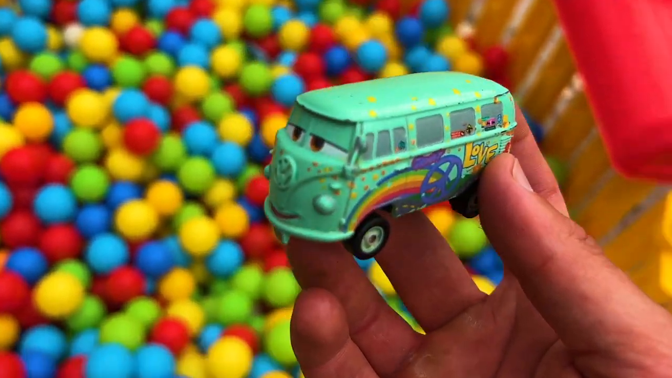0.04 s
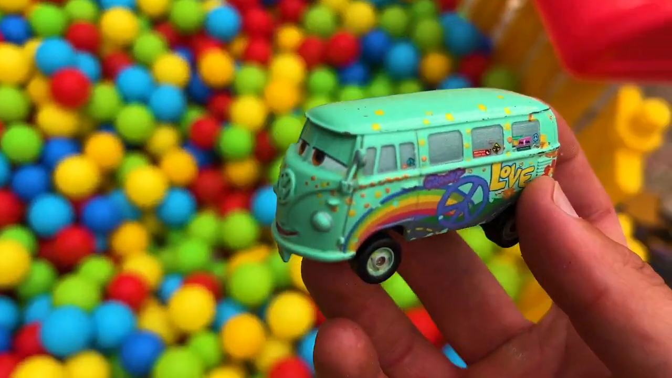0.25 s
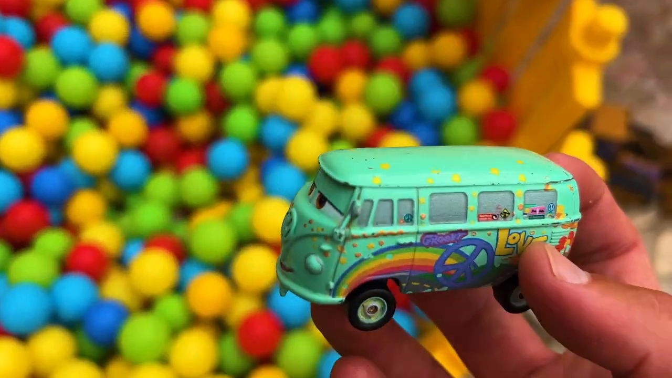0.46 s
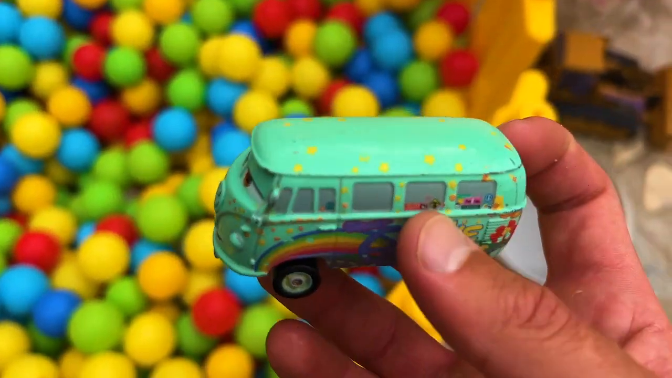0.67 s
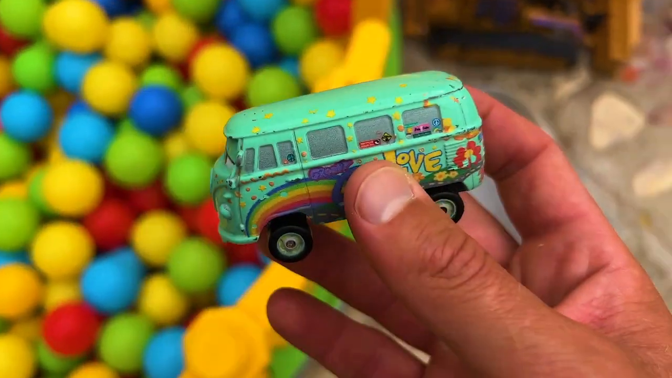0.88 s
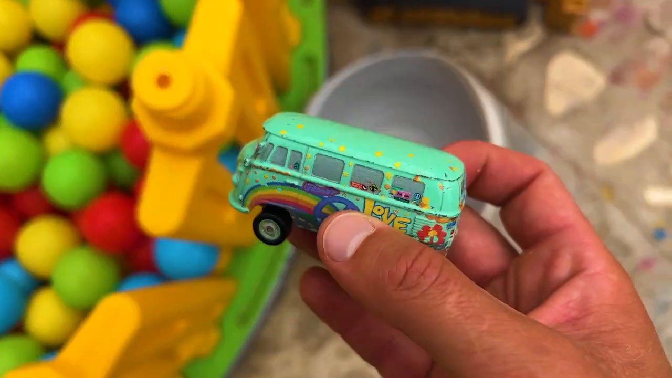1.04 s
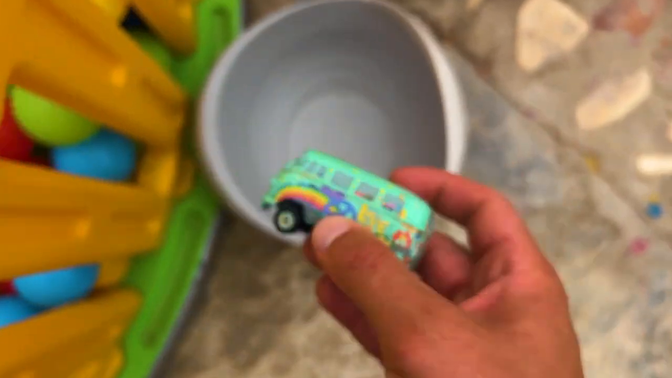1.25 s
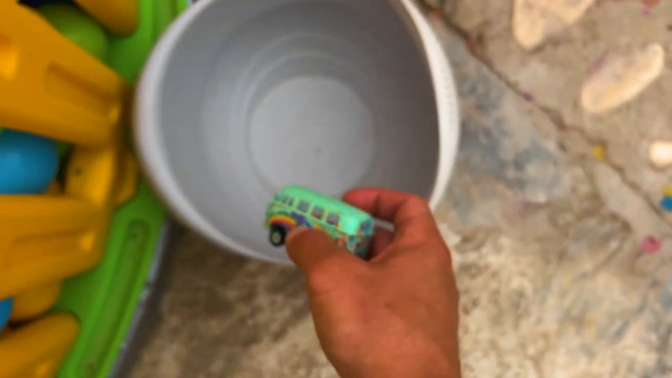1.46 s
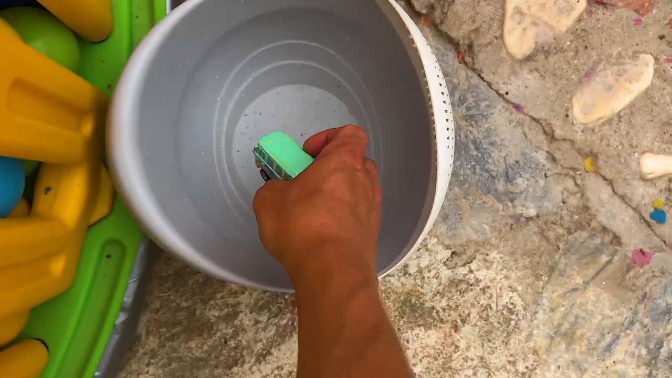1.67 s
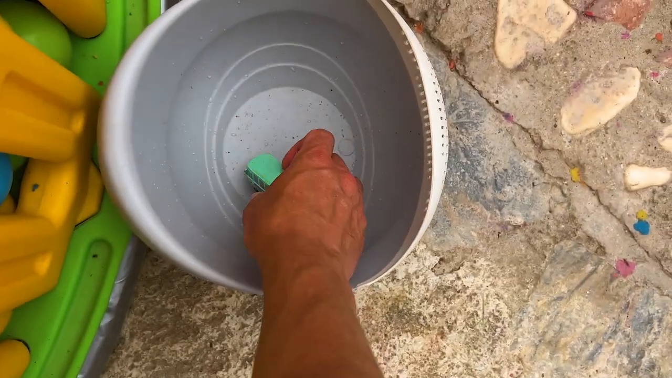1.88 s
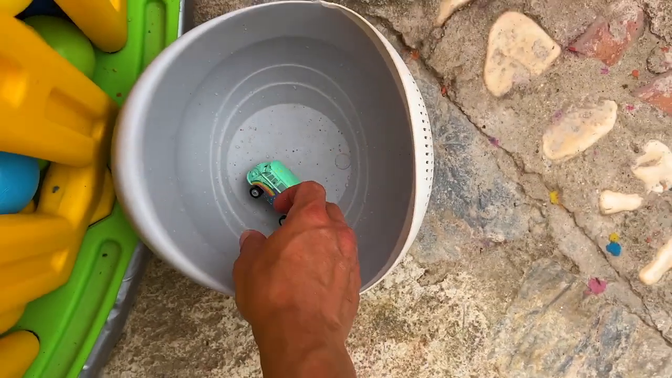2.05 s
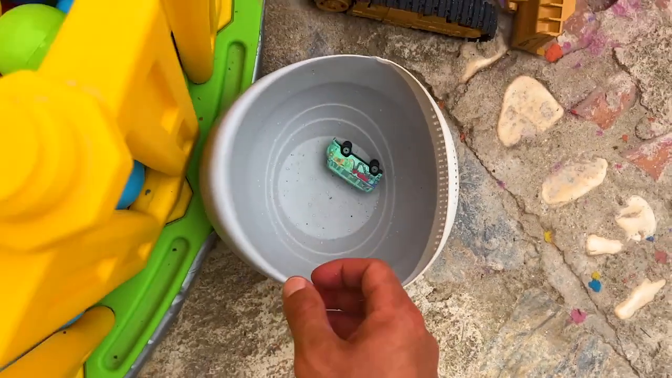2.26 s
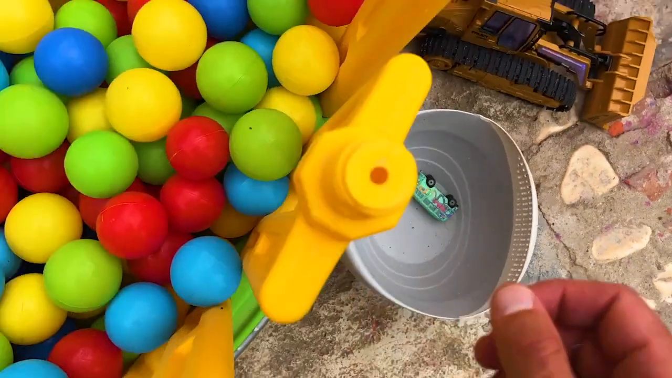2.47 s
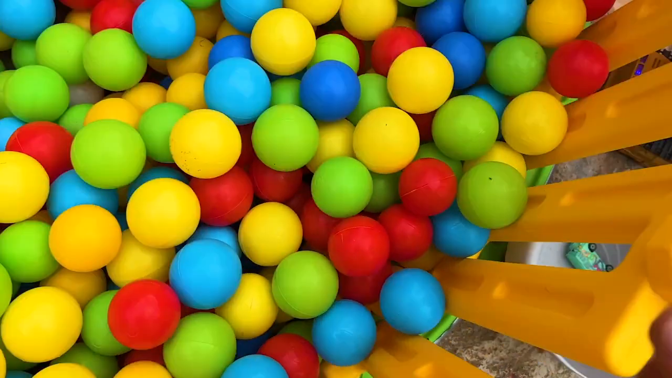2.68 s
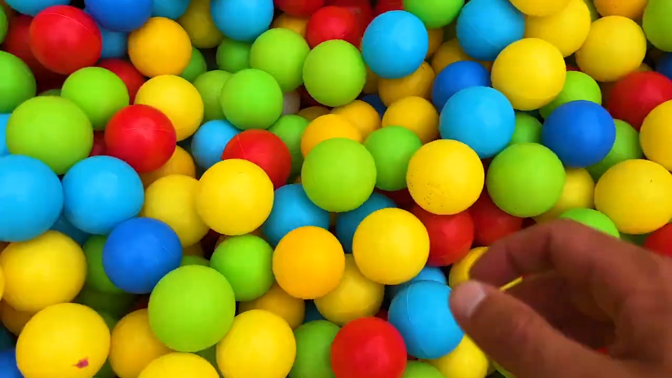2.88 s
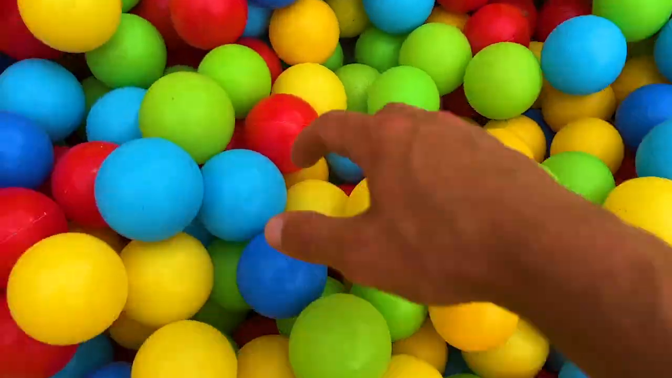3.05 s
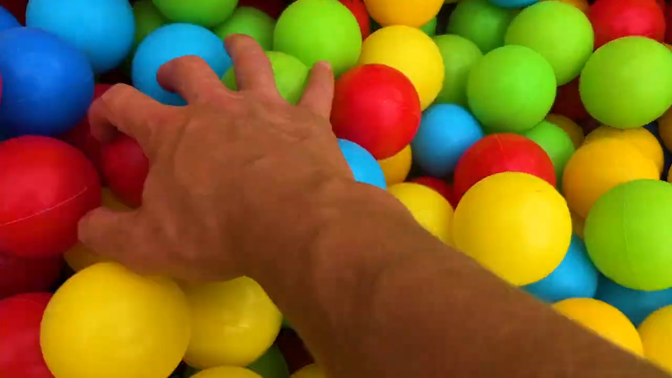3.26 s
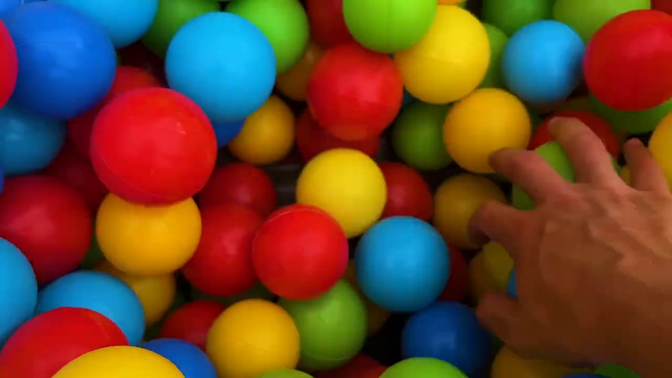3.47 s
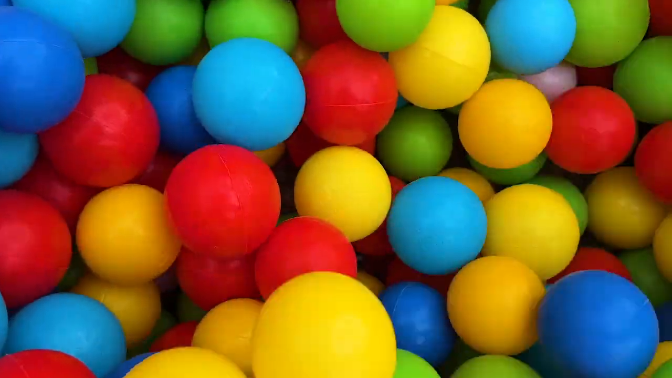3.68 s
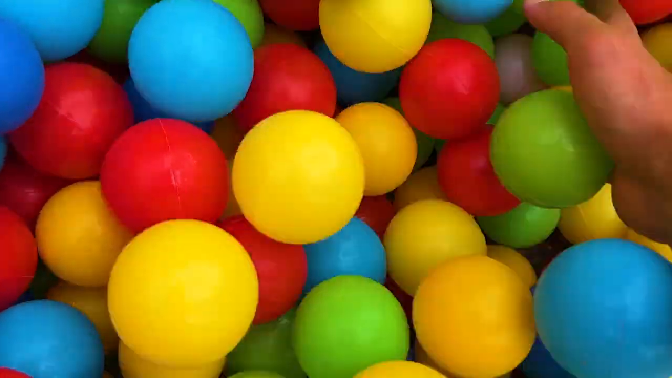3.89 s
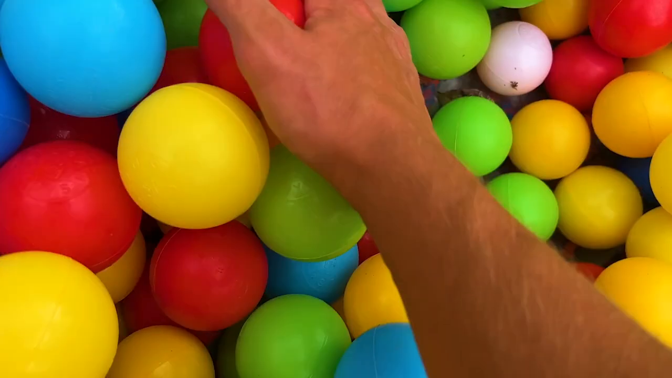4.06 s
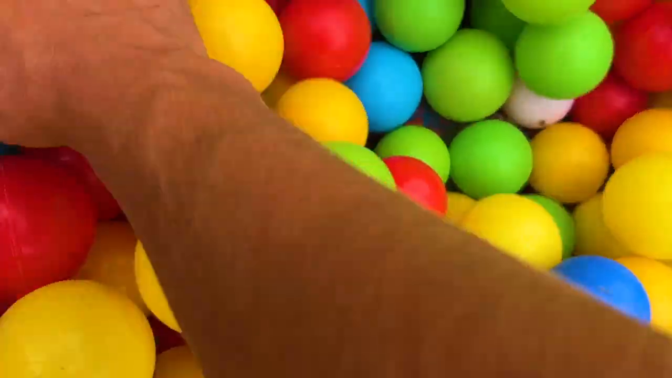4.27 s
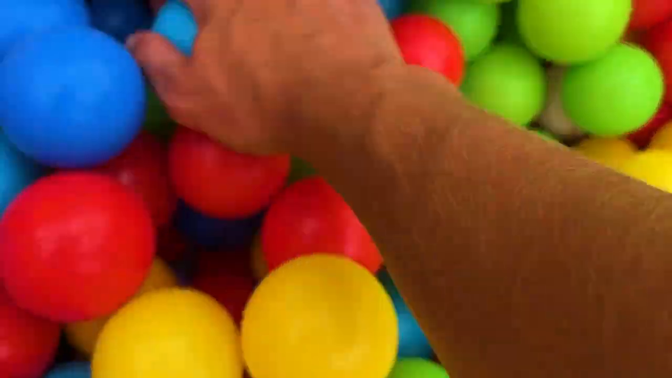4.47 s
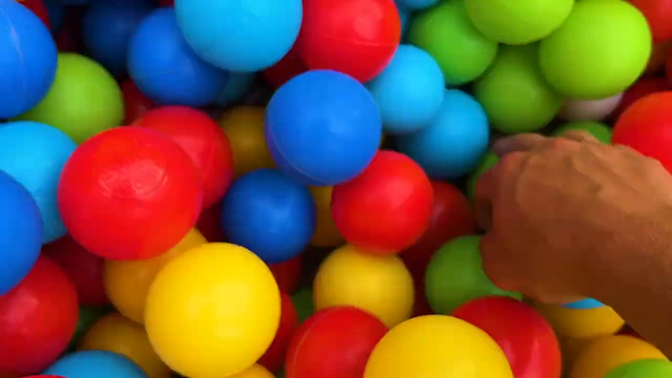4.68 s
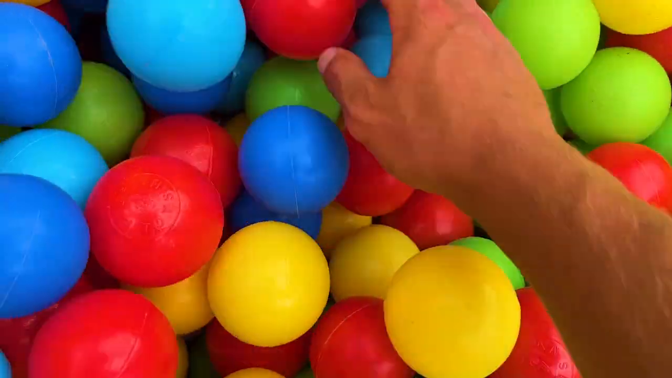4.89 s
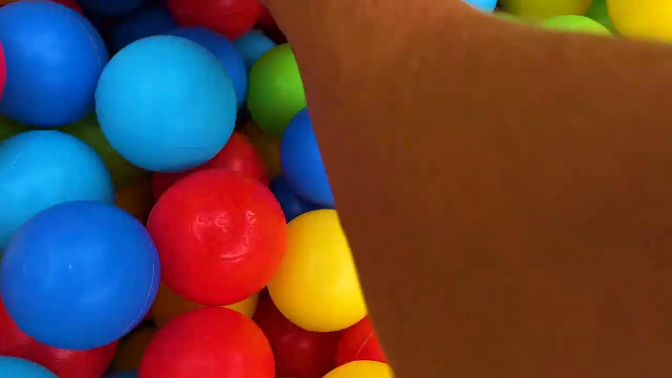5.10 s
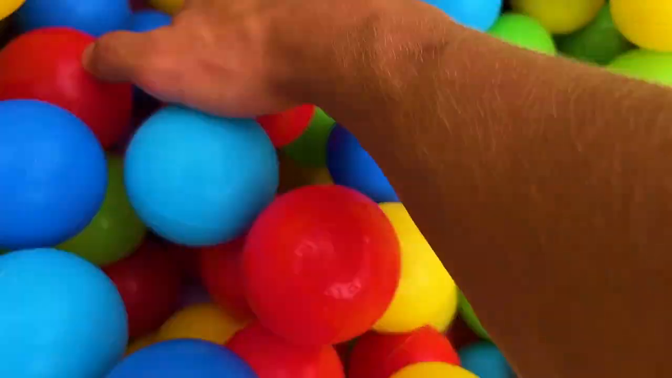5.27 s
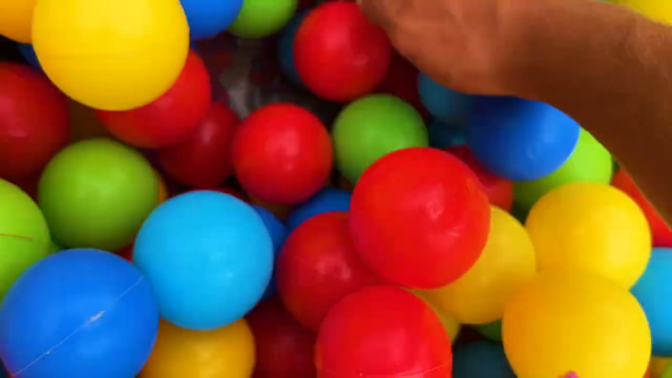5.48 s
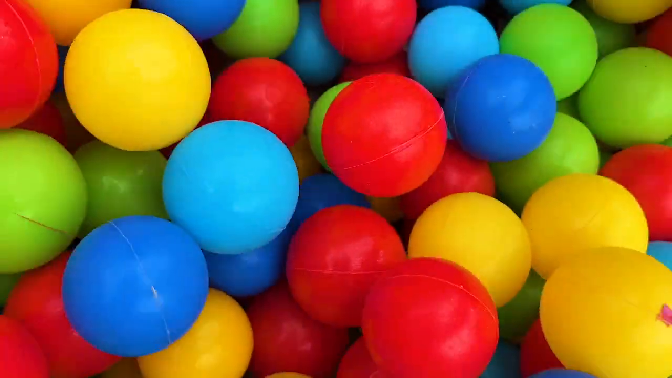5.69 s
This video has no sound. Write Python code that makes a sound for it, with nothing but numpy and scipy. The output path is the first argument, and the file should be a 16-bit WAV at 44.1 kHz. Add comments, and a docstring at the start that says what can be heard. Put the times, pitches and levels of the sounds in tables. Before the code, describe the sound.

Outdoors, light toy ticks, a sharp hollow drop in a plastic bucket, then a dense thumping, clacking churn of ball-pit balls.

```python
"""Outdoors, close to a hand-held phone: far town hiss and a low rumble run throughout, both shaped noise.
First an insect chirps (narrow noise) and a far bird coos twice (sines), while a small metal toy van rattles
in a hand (short rings and snaps). It is dropped into a plastic tub, where it knocks, slides and settles:
blows and gritty noise ring the tub. After more ticks and a brief rustle, the hand rummages through a pit of
hollow plastic balls to the end: hundreds of damped thumps and clacks over shell noise."""
import sys
import numpy as np
from scipy import signal
from scipy.fft import rfft, irfft, next_fast_len
from scipy.io import wavfile
from scipy.ndimage import uniform_filter1d, map_coordinates

SR = 44100
rng = np.random.default_rng(int(sys.argv[2]) if len(sys.argv) > 2 else 0)


def volts_from_decibels(level):
    """Turn decibel levels (scalar or array-like) into linear amplitude factors."""
    exponent = np.asarray(level, float) / 20
    return 10 ** exponent


def int16_out(signal):
    """Quantize to a 16-bit WAV file."""
    q = np.round(np.clip(np.atleast_2d(signal).T, -1, 1) * 32767)
    wavfile.write(sys.argv[1], SR, q.astype(np.int16))


N = 253003  # length in samples


def unit(x):
    """Scales x to rms 1."""
    return x / np.sqrt(np.mean(x ** 2) + 1e-20)


def along(points, hz):
    """Reads a curve of (frequency [Hz], value) points on a log frequency axis."""
    f, v = np.transpose(points)
    return np.interp(np.log(hz + 1), np.log(f + 1), v)


def curves(rows, outside=None):
    """Gives one value per sample for each column after the time."""
    s, *cols = np.transpose(rows)
    return [np.interp(np.arange(N) / SR, s, c, outside, outside) for c in cols]


def wobble(rate):
    """Draws a smooth random curve with rate knots a second."""
    knots = rng.standard_normal(int(N * rate / SR) + 4)
    return map_coordinates(knots, [np.arange(N) * rate / SR])


def filtered(x, response):
    """Multiplies the spectrum of x by a complex response of frequency."""
    m = next_fast_len(N + 8192)
    return irfft(rfft(x, m) * response(np.fft.rfftfreq(m, 1 / SR)), m)[..., :N]


def coloured(x, spectrum):
    """Gives x the colour of a (Hz, dB) spectrum; white noise of rms 1 stays at rms 1."""
    return filtered(x, lambda hz: unit(volts_from_decibels(along(spectrum, hz))))


def patchy(count, depth_db):
    """Makes white noise lanes whose gain varies in small patches of pitch and time."""
    z = signal.stft(rng.standard_normal((count, N)), nperseg=512)[2]
    field = uniform_filter1d(rng.standard_normal(z.shape), size=3, axis=1)
    field = uniform_filter1d(field, size=7, axis=2)
    return signal.istft(z * volts_from_decibels(depth_db * unit(field)), nperseg=512)[1][:, :N]


def pair(alike, depth_db):
    """Makes patchy stereo noise whose left-right likeness depends on frequency."""
    def mid_side(hz):
        turn = np.arccos(np.clip(along(alike, hz), -1, 1)) / 2
        return np.array([np.cos(turn), np.sin(turn)])
    mid, side = filtered(patchy(count=2, depth_db=depth_db), mid_side)
    return unit(np.array([mid + side, mid - side]))


def swells(start, length, db, rise, fall):
    """Makes a gain curve per row: a rise, a hold and a fall, straight in dB per second."""
    t = np.arange(N) / SR - np.reshape(start, (-1, 1))
    after = t - np.reshape(length, (-1, 1))
    lost_db = rise * np.clip(-t, 0, None) + fall * np.clip(after, 0, None)
    return volts_from_decibels(np.reshape(db, (-1, 1)) - lost_db)


def scatter(s, shapes, lane=0, count=1):
    """Adds short shapes (one row each) at times s into their lanes."""
    lane = np.broadcast_to(lane, len(s))
    at = np.round(s * SR).astype(int)[:, None] + np.arange(shapes.shape[1])
    keep = at < N
    return np.bincount((at + lane[:, None] * N)[keep], shapes[keep], count * N).reshape(count, N)


def pings(hz, db, cycles, size, rise_s):
    """Makes damped sines that lose 8.7 dB in the given number of cycles, after a soft start."""
    t = np.arange(size) / SR
    turn = hz[:, None] * t
    return volts_from_decibels(db)[:, None] * np.sin(2 * np.pi * turn) * np.exp(-turn / cycles) * (1 - np.exp(-t / rise_s))


def snaps(db, life_s, size, rise):
    """Makes short noise bursts that rise over a share of their life and die away."""
    t = np.arange(size) / SR / np.reshape(life_s, (-1, 1))
    noise = rng.standard_normal((len(db), size))
    return volts_from_decibels(db)[:, None] * noise * np.exp(-t) * (1 - np.exp(-t / rise))


def modes(table):
    """Builds the response of resonances (frequency [Hz], width [Hz], level [dB]) with alternating signs."""
    def response(f):
        total = 0
        for k, (centre, width, db) in enumerate(table):
            damping = 1j * f * width
            total = total + (-1) ** k * volts_from_decibels(db) * damping / (centre * centre - f * f + damping)
        return total
    return response


# colour of the far hiss: (frequency [Hz], level per Hz [dB])
TOWN_COLOUR = [(71, 5), (120, -2), (152, -6), (442, -8.5), (706, -16), (1940, -8.5), (2320, -11.5),
               (2650, -25), (2980, -20.5), (4400, -23), (4850, -26.5), (6760, -24.5), (9050, -35),
               (11700, -23.5), (12600, -70.5), (16400, -81.5), (22000, -120)]
# how alike left and right are in that hiss: (frequency [Hz], likeness [0 to 1])
TOWN_ALIKE = [(60, 0.33), (300, 0.19), (1250, 0.016), (12200, 0.1)]


def town():
    """Far hiss: coloured noise at a slowly wandering level, and one brief rustle of the same colour."""
    rustle = swells(2.945, 0.087, -53, rise=63, fall=30)[0]
    level = np.hypot(volts_from_decibels(-56.5), rustle)
    return level * volts_from_decibels(0.6 * wobble(3.6)) * coloured(pair(TOWN_ALIKE, depth_db=1.5), TOWN_COLOUR)


def insect():
    """Insect: a narrow band of noise near 4.5 kHz in six regular chirps, each weaker than the last."""
    buzz = filtered(pair([(4500, 0.51)], depth_db=4.0), lambda hz: np.exp(-((hz - 4520) / 130) ** 2))
    k = np.arange(6)
    first_s, every_s, fade_db = -0.14, 0.336, 1.5  # the first has begun before the start
    chirps = swells(first_s + every_s * k, 0.23, -72 - fade_db * k, rise=860, fall=76)
    return chirps.sum(0) * unit(buzz)


# a far bird, perhaps a dove: (start [s], length [s], level [dB], pitch [Hz])
BIRD_COOS = [(0.0, 0.058, -60, 282), (0.18, 0.068, -55, 498)]


def bird():
    """Far bird: two faint sines that waver in pitch and level."""
    s, length, db, hz = np.transpose(BIRD_COOS)
    pitch = hz[:, None] * (1 + 0.012 * wobble(40))
    level = swells(s, length, db, rise=730, fall=350) * volts_from_decibels(2.5 * wobble(50))
    return (level * np.sin(2 * np.pi * np.cumsum(pitch, 1) / SR)).sum(0)


# low rumble, with the deep part of tub knocks and shifting balls: (time [s], level [dB])
RUMBLE_LEVEL = [(0.0, -55), (0.05, -54.5), (0.48, -61.5), (1.6, -56.5), (1.82, -45.5), (1.97, -40),
                (2.04, -46), (2.09, -40), (2.25, -52), (2.28, -43), (2.44, -49), (2.57, -35), (2.68, -49.5),
                (3.42, -44.5), (3.69, -55), (3.87, -37.5), (4.84, -47.5), (4.94, -38), (5.11, -45),
                (5.26, -32.5), (5.35, -44), (5.69, -40), (5.74, -56)]
# its colour: (frequency [Hz], level per Hz [dB])
RUMBLE_COLOUR = [(12, -71.5), (25, -41), (42, -14), (59, 6.5), (110, -2), (130, -9), (200, -24),
                 (260, -29.5), (440, -120)]


def rumble():
    """Low rumble: wind and handling, with the deep part of tub knocks and shifting balls, as deep noise."""
    deep = coloured(pair([(40, 1.0), (130, 0.8)], depth_db=4.0), RUMBLE_COLOUR)
    return volts_from_decibels(curves(RUMBLE_LEVEL)[0] + 1.03 * wobble(4.23)) * deep


# answer of nearby surfaces: (frequency [Hz], time to die by 60 dB [s])
YARD_DECAY = [(200, 0.15), (2000, 0.11), (10000, 0.064)]


def yard(x):
    """Nearby surfaces: a short noise tail in which each frequency dies at its own speed."""
    hz, t, z = signal.stft(rng.standard_normal((2, SR // 3)), SR, nperseg=256)
    tail = signal.istft(z * volts_from_decibels(-60 * t / along(YARD_DECAY, hz)[:, None]), SR, nperseg=256)[1]
    tail = tail / np.linalg.norm(tail[0])
    late = np.pad(x, (150, 0))  # 3.4 ms late
    return signal.fftconvolve(late[None], tail, axes=1)[:, :N]


# colour of metal on plastic: (frequency [Hz], level per Hz [dB])
CRACK_COLOUR = [(880, -8), (1500, -4.5), (5260, -1), (5700, -6.5), (7580, -4), (9650, -16), (10800, -2),
                (11950, -10), (12250, -58.5), (16400, -70.5), (22000, -120)]


def cracking(x):
    """Hard contact: gives noise the bright colour of metal on plastic."""
    return coloured(x, CRACK_COLOUR)


# loose axles of the toy, and other small ticks: (time [s], ring level [dB], ring pitch [Hz], snap level [dB])
TOY_TICKS = [(0.222, -48.5, 1050, -64), (0.398, -49, 1840, -64), (0.504, -42.5, 1480, -70),
             (0.549, -40, 1870, -69), (0.637, -43, 1650, -69), (0.732, -37.5, 1510, -86),
             (1.199, -54, 1830, -62.5), (1.259, -34.5, 1530, -62), (1.363, -49, 1170, -72),
             (1.407, -42.5, 1520, -69), (1.704, -38, 1950, -55), (2.637, -44.5, 794, -65),
             (2.776, -38, 2030, -54.5), (2.815, -50, 860, -84), (2.883, -41, 1470, -60.5),
             (2.928, -41, 1360, -61.5)]


def ticks():
    """Small ticks: each is a short ring and a bright snap."""
    s, ring_db, hz, snap_db = np.transpose(TOY_TICKS)
    snap = scatter(s, snaps(snap_db + 14.0, life_s=0.0011, size=700, rise=0.24))[0]
    ring = scatter(s, pings(hz, ring_db - 0.5, cycles=3.5, size=900, rise_s=0.00039))[0]
    return ring + cracking(snap)


# treble of the toy's ticks (short rows), and a few longer soft rubs: (start [s], length [s], level [dB])
TREBLE_BURSTS = [(0.154, 0.11, -72), (1.199, 0.0054, -62), (1.257, 0.0095, -55.5), (1.359, .01, -65.5),
                 (1.405, 0.0062, -56), (1.457, 0.12, -69.5), (1.705, 0.011, -63)]


def tick_treble():
    """Treble of the toy's ticks, and a few longer soft rubs: uneven high noise."""
    grain = rng.standard_normal(N) * volts_from_decibels(3 * wobble(72))
    treble = filtered(grain, lambda hz: 1 / (1 + (7200 / (hz + 1)) ** 8))
    return swells(*np.transpose(TREBLE_BURSTS), rise=9200, fall=1500).sum(0) * unit(cracking(treble))


# resonances of the tub, its floor in the first three rows and its rim above:
# (frequency [Hz], width [Hz], level [dB])
TUB_MODES = [(448, 246, -1), (563.5, 62, 6.5), (784, 65, -6), (1210, 115, -3), (1464, 71, -3.5),
             (1720, 120, -9.5), (2300, 990, -12.5), (3700, 1200, -12.5)]


def ring_tub(on_floor, on_rim):
    """Plastic tub: whatever strikes or rubs it rings its floor and its rim."""
    return filtered(on_floor, modes(TUB_MODES[:3])), filtered(on_rim, modes(TUB_MODES[3:]))


# toy against tub: (time [s], floor ring level [dB], low knock level [dB], crack level [dB], contact length [s])
TUB_KNOCKS = [(1.8726, -14, -28, -21, 0.0015), (1.879, -20, -19.5, -54, 0.0033),
              (1.894, -22, -29.5, -45, 0.0027), (1.927, -17.5, -40, -24.5, 0.0012),
              (1.93, -9.5, -27, -39, 0.0031), (1.967, -19.5, -11.5, -17.5, 0.0055),
              (1.971, -7, -3.5, -26, 0.0023), (1.987, -32, -13, -21, 0.0034),
              (1.999, -19, -17.5, -23.5, 0.0013), (2.025, -21.5, -25, -34.5, 0.0054),
              (2.078, -16, -24, -27, 0.0037), (2.085, -10.5, -10.5, -14.5, 0.0015),
              (2.09, 2.5, -30, -49.5, 0.0046), (2.107, -11.5, -42, -29, 0.002),
              (2.142, -40, -44, -25.5, 0.0029), (2.181, -22.5, -33.5, -28.5, 0.0055),
              (2.225, -18, -42.5, -31, 0.0025), (2.262, -43, -18, -16, 0.00236),
              (2.278, -32, -24, -48, 0.0043), (2.302, -31, -26, -27.5, 0.0038),
              (2.312, -16.5, -43, -49, 0.00065), (2.343, -18, -24, -26, 0.0036),
              (2.379, -23.5, -42, -38, 0.0024), (2.43, -32, -47, -61, 0.0061),
              (2.471, -45, -36, -70, 0.0046), (2.545, -51.5, -39.5, -32.5, 0.0076)]


def knocks():
    """Blows: each contact rings floor and rim, cracks, and pushes air in a low knock."""
    s, floor_db, knock_db, crack_db, contact_s = np.transpose(TUB_KNOCKS)
    rim_db = 0.45 * floor_db + 0.55 * crack_db + 25  # follows both floor and crack
    blow = np.hanning(14)[None]  # a third of a millisecond
    on_floor = scatter(s, volts_from_decibels(floor_db + 15.5)[:, None] * blow)[0]
    on_rim = scatter(s, snaps(rim_db, life_s=0.62 * contact_s, size=900, rise=0.27))[0]
    on_rim = on_rim + scatter(s, volts_from_decibels(rim_db - 1.5)[:, None] * blow)[0]
    floor, rim = ring_tub(on_floor, on_rim)
    crack = scatter(s, snaps(crack_db + 14.5, life_s=0.91 * contact_s, size=1500, rise=2.68))[0]
    knock_hz = 319 * (0.0028 / contact_s) ** 0.64  # a longer contact knocks lower
    push = pings(knock_hz, knock_db + 9.5, cycles=0.56, size=1500, rise_s=0.00091)
    knock = scatter(s + 0.00376, push)[0]  # the tub flexes just after the blow
    return floor + knock, rim + cracking(crack)


# toy scraping in the tub: (start [s], length [s], wall level [dB], hiss level [dB])
TUB_SCRAPES = [(1.889, 0.0072, -37, -56), (1.958, 0.03, -25.5, -58), (2.035, 0.039, -33.5, -51),
               (2.157, 0.027, -27, -42.5), (2.234, 0.06, -31.5, -55), (2.313, 0.028, -37.5, -51),
               (2.378, 0.014, -29.5, -61), (2.433, 0.065, -47, -85), (2.538, 0.053, -45.5, -58)]


def scrapes():
    """Scraping: fine grains of noise shake the floor, the rim and the air, and hiss."""
    start, length, *levels = np.transpose(TUB_SCRAPES)
    wall, hiss = (swells(start, length, db, rise=1200, fall=530).sum(0) for db in levels)

    def grit():
        return unit(rng.standard_normal(N) * volts_from_decibels(4.5 * wobble(170)))
    floor, rim = ring_tub(volts_from_decibels(13.5) * wall * grit(), volts_from_decibels(5.5) * wall * grit())
    drag = filtered(volts_from_decibels(5) * wall * grit(), modes([(280, 380, 0.0048)]))
    return floor + drag, rim + cracking(hiss * grit())


# the note that hangs in the tub after a blow, shifted by where the toy rests:
# (time [s], level [dB], pitch [Hz])
TUB_HOLLOWS = [(1.973, -19.5, 406), (2.093, -19, 562), (2.142, -30, 528), (2.184, -25.5, 564),
               (2.227, -29.5, 427), (2.25, -28.5, 436), (2.312, -29, 597), (2.379, -27.5, 600),
               (2.431, -34.5, 506), (2.457, -40, 478)]


def hollow():
    """Hollow note: two damped sines, the upper one 2.7 times as high, with an uneven level."""
    s, db, hz = np.transpose(TUB_HOLLOWS)
    note = pings(hz, db, cycles=9.0, size=4000, rise_s=0.002)
    note = note + pings(2.7 * hz, db - 8, cycles=16.0, size=4000, rise_s=0.001)
    return scatter(s, note)[0] * volts_from_decibels(1.2 * wobble(90))


def tub():
    """Toy in the tub: blows, scrapes and hollow notes as a low body and a bright part."""
    knock_body, knock_bright = knocks()
    scrape_body, scrape_bright = scrapes()
    return knock_body + scrape_body + hollow(), knock_bright + scrape_bright


def stir_times(u):
    """Spreads random numbers from 0 to 1 over the time from the first stir to the end."""
    start = HAND_STIR[0][0]
    return start + (N / SR - start) * u


def collisions(count, centre_hz, spread, scatter_db, cycles, size):
    """Random contacts in the pit, each ball at its own pitch, strength and direction; rms 1."""
    u, g = rng.random((count, 3)), rng.standard_normal((count, 2))
    db = scatter_db * np.clip(g[:, 1], -2, 2)
    hz = centre_hz * np.exp(spread * g[:, 0])
    shapes = pings(hz, db, cycles, size, rise_s=0.039 / centre_hz) * np.sign(u[:, 2:] - 0.5)
    lane = (u[:, 1] * len(LEFT_LAGS)).astype(int)
    lanes = scatter(stir_times(u[:, 0]), shapes, lane, len(LEFT_LAGS))
    return lanes / np.std(lanes[:, round(HAND_STIR[0][0] * SR):].sum(0))


def taps(count, life_s, scatter_db):
    """Gain of the shell noise per direction: each contact starts fast and dies in milliseconds."""
    u, t = rng.random((count, 3)), np.arange(600) / SR / life_s
    strength = volts_from_decibels(-scatter_db * np.log(u[:, 2:] + 0.02))
    shapes = strength * np.exp(-t) * (1 - np.exp(-t / 0.15))
    lane = (u[:, 1] * len(LEFT_LAGS)).astype(int)
    return scatter(stir_times(u[:, 0]), shapes, lane, len(LEFT_LAGS))


# colour of the shell noise as it is heard in the end: (frequency [Hz], level per Hz [dB])
SHELL_COLOUR = [(290, -6), (500, -2), (682, -9.5), (1290, -7.5), (2010, -10), (2850, -11), (3350, -18),
                (6240, -22.5), (8290, -19.5), (9750, -24), (11200, -16), (11900, -26), (12250, -64.5),
                (16400, -82), (22000, -120)]


def shell_rub():
    """Sliding shells: a steady hiss under the separate taps."""
    steady = volts_from_decibels(-5)
    rub = patchy(count=len(LEFT_LAGS), depth_db=4.0) * (steady + taps(count=500, life_s=0.004, scatter_db=4))
    return coloured(rub / np.std(rub.sum(0)), SHELL_COLOUR)


# the clearest ball blows: (time [s], level [dB], pitch [Hz])
BALL_THUDS = [(3.204, -18.5, 316), (3.252, -15, 332), (3.297, -16, 380), (3.37, -11.5, 377),
              (3.39, -13, 367), (3.401, -12, 345), (3.42, -10.5, 364), (3.46, -15, 352), (3.494, -12, 288),
              (3.73, -19.5, 297), (3.825, -15, 288), (3.872, -18, 400), (3.903, -11, 280),
              (3.939, -14, 267), (4.213, -16, 467), (4.264, -17, 400), (4.309, -16, 474), (4.365, -20, 355),
              (4.533, -13.5, 530), (4.574, -13, 476), (4.784, -24, 393), (4.886, -16.5, 348),
              (5.018, -14, 448), (5.167, -17, 453), (5.309, -15.5, 332), (5.405, -19, 352),
              (5.48, -13, 287), (5.542, -17, 343)]


def thuds():
    """Clear blows: the air in a ball thumps as a quickly damped sine, straight ahead."""
    s, db, hz = np.transpose(BALL_THUDS)
    ways = len(LEFT_LAGS)
    return scatter(s, pings(hz, db, cycles=1.63, size=1300, rise_s=0.0012), ways // 2, ways)


# sharp shell clicks near the microphone: (time [s], level [dB])
SHELL_CLICKS = [(3.617, -29.5), (3.783, -35), (3.82, -25.5), (3.901, -35), (3.944, -22), (4.136, -24),
                (4.577, -31.5), (4.7585, -29.5), (4.785, -35.5), (4.8664, -33), (5.152, -27.5),
                (5.373, -26)]


def clicks():
    """Sharp clicks: short bright noise bursts, straight ahead."""
    s, db = np.transpose(SHELL_CLICKS)
    ways = len(LEFT_LAGS)
    return cracking(scatter(s, snaps(db - 0.5, life_s=0.0022, size=700, rise=0.3), ways // 2, ways))


# hollow raps of single shells that stand out of the clatter: (time [s], level [dB], pitch [Hz])
SHELL_RAPS = [(3.258, -19, 1010), (3.349, -11.5, 802), (3.367, -10.5, 775), (3.458, -20, 855),
              (3.494, -19, 820), (3.618, -17.5, 1250), (3.662, -16.5, 1000), (3.729, -22, 1040),
              (3.783, -16, 2240), (3.814, -19, 1240), (3.942, -10, 2220), (4.138, -12.5, 1000),
              (4.371, -14, 2150), (4.423, -17, 1230), (4.522, -20, 1160), (4.62, -21, 1060),
              (4.651, -11, 1130), (4.711, -18.5, 1540), (4.759, -21, 1280), (4.786, -18.5, 1850),
              (4.884, -19, 2180), (4.903, -17, 1280), (4.938, -16, 1600), (4.978, -25, 837),
              (5.302, -14, 965), (5.343, -28, 840)]


def raps():
    """Hollow raps: two damped sines per shell, each rap from a random direction."""
    s, db, hz = np.transpose(SHELL_RAPS)
    shell = pings(hz, db - 9, cycles=4.0, size=700, rise_s=0.00018)
    shell = shell + pings(2.18 * hz, db - 12, cycles=3.7, size=700, rise_s=0.00031)
    ways = len(LEFT_LAGS)
    return scatter(s, shell, rng.integers(ways, size=len(s)), ways)


# the hand in the pit; a deep push thuds more and hisses less: (time [s], effort [dB], depth [dB])
HAND_STIR = [(3.15, -77, -2), (3.18, -66, -14.5), (3.21, -32, -2.5), (3.24, -29.5, 0.5), (3.26, -23.5, 2),
             (3.34, -28, -3.5), (3.39, -20.5, -2.5), (3.44, -27.5, 0.5), (3.49, -23.5, -2), (3.57, -31, -1),
             (3.7, -33.5, -2.5), (3.86, -23.5, -3.5), (4.06, -29, -1), (4.31, -33, 1), (4.6, -25.5, -2),
             (4.74, -35.5, 0.5), (4.82, -37.5, -0.5), (4.86, -40.5, 0), (4.89, -31.5, -6.5),
             (4.91, -33.5, -2), (5.01, -28, 1.5), (5.07, -36.5, -0.5), (5.13, -33, 0), (5.17, -26, 0),
             (5.54, -30, -3.5), (5.74, -38, 1)]


def balls():
    """Ball pit: hundreds of collisions a second; air in the balls thumps, shells clack and hiss."""
    effort_db = curves(HAND_STIR, outside=-120)[0]
    depth_db = curves(HAND_STIR)[1]
    usual_db = -27.5
    hiss_db = usual_db + 0.75 * (effort_db - usual_db) - depth_db - 8  # swings less than the effort
    # the whole heap shifting
    heave = collisions(count=500, centre_hz=140, spread=0.233, scatter_db=5.0, cycles=1.65, size=2000)
    thump = collisions(count=750, centre_hz=335.0, spread=0.27, scatter_db=1.0, cycles=1.37, size=1100)
    clack = collisions(count=800, centre_hz=1450, spread=0.55, scatter_db=4.5, cycles=8.0, size=900)
    clack = filtered(clack, lambda hz: 1 / (1 + (hz / 3000) ** 14))  # soft shells do not ring higher
    low = volts_from_decibels(effort_db + depth_db) * (volts_from_decibels(-2.5) * thump + volts_from_decibels(-6) * heave) + thuds()
    low = filtered(low, lambda hz: (1j * hz / (70 + 1j * hz)) ** 2)  # small balls push no deep bass
    return low + raps() + volts_from_decibels(effort_db - 8.5) * clack + volts_from_decibels(hiss_db) * shell_rub() + clicks()


def ports(lanes, lags, shade_db):
    """Two ports: each direction has its own lag; the phone shades the far port in the treble."""
    lag = np.asarray(lags)[:, None]

    def heard(hz, k):
        delay = np.exp(-k * 1j * np.pi * hz * lag)
        return delay * volts_from_decibels(-k * shade_db * lag * 3000 * hz / (hz + 1500))
    return np.array([filtered(lanes, lambda hz: heard(hz, k)).sum(0) for k in (1, -1)])


# directions of the balls, one entry each: (arrival at the left port after the right [s])
LEFT_LAGS = [-.00035, -.00015, 0, .00012, .0003]


def scene():
    """Puts all sources at their directions and adds the answer of nearby surfaces."""
    background = town() + insect() + bird() + rumble()
    body, bright = tub()
    toy = np.array([body, bright, ticks() + tick_treble()])
    pit = balls()
    near = ports(pit, LEFT_LAGS, shade_db=10.0) + ports(toy, [0.00013, 0.00011, 0.0002], shade_db=11.5)
    answer = volts_from_decibels(-16.5) * yard(pit.sum(0)) + volts_from_decibels(-12.0) * yard(toy.sum(0))
    return near + answer + background


def band_limit(x):
    """A steep low-pass at the top of the band."""
    return signal.sosfilt(signal.butter(12, 12830, fs=SR, output="sos"), x)


# gain of left minus right: (frequency [Hz], gain [dB])
SIDE_GAIN = [(30, -1), (60, -16), (125, -4), (250, -17.5), (340, -16), (500, -8.5), (1000, 1.5),
             (2000, -1.5), (4000, -2.5), (4800, 0), (7000, -4), (9500, 2.5)]


def record(dry):
    """Sets the stereo width by frequency, narrow in bass and top, and rounds off high peaks."""
    narrow_hz = 10900  # left minus right fades steeply around here
    side = filtered(dry[0] - dry[1], lambda hz: volts_from_decibels(along(SIDE_GAIN, hz)) / (1 + (hz / narrow_hz) ** 24)) / 2
    mid = dry.mean(0)
    wide = np.array([mid + side, mid - side])
    wide = wide * volts_from_decibels([[-0.3], [0.3]])  # the right port is a little more sensitive
    rounded = 0.85 * np.tanh(wide / 0.85)
    return band_limit(rounded)


dry = scene()
out = record(dry)
int16_out(out)
```